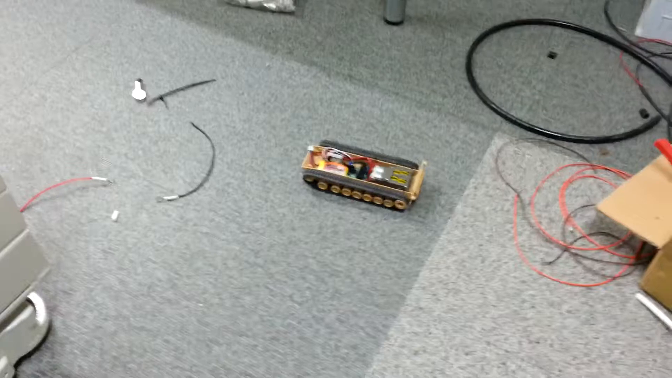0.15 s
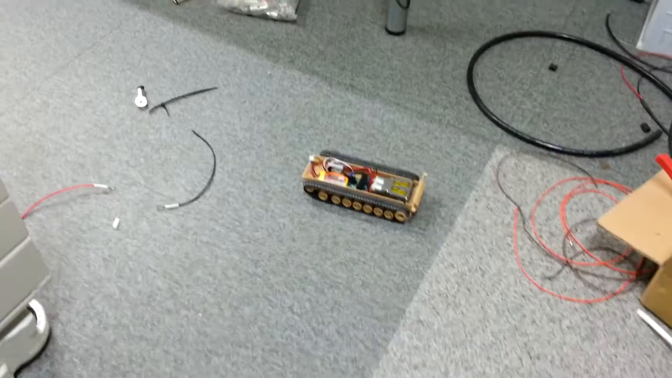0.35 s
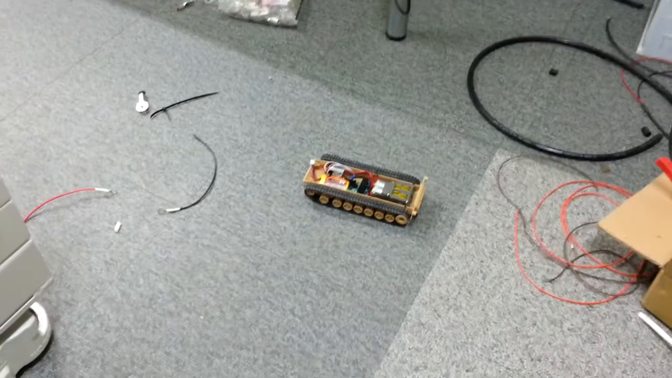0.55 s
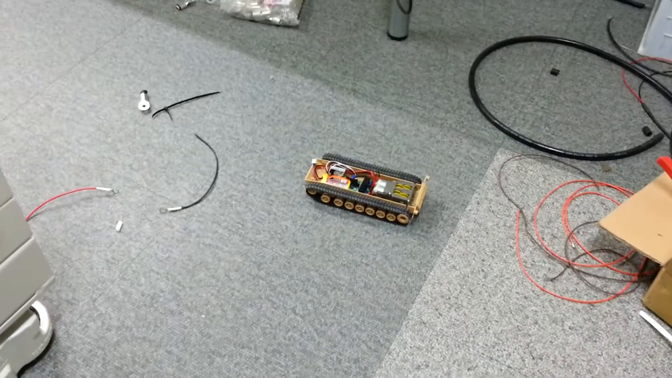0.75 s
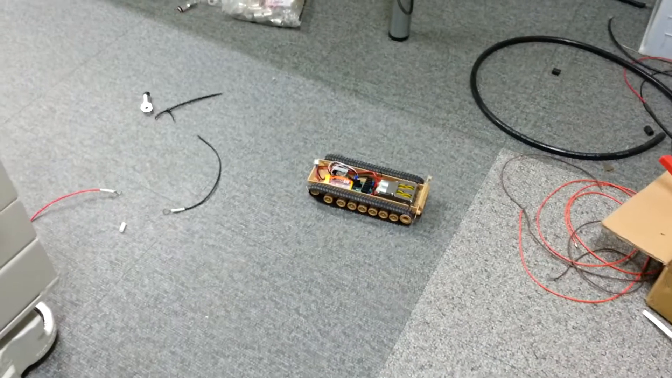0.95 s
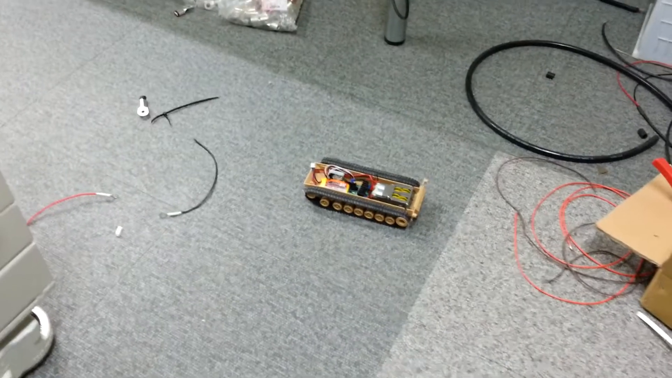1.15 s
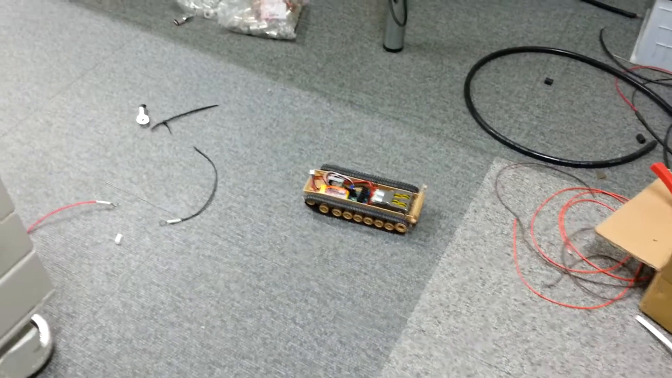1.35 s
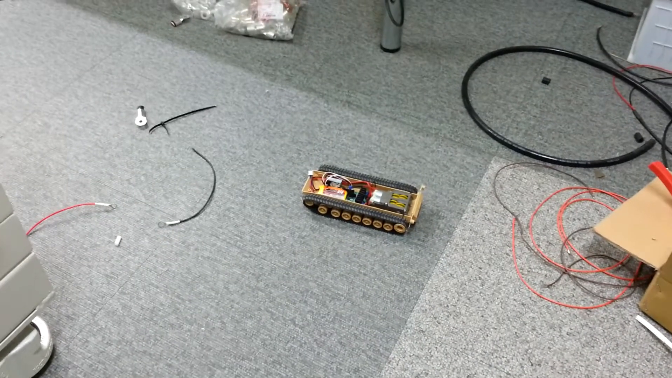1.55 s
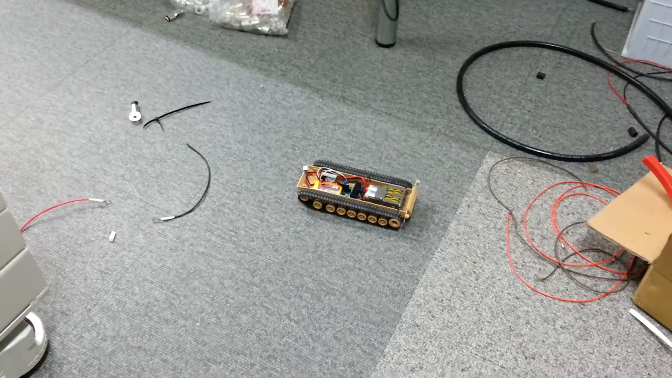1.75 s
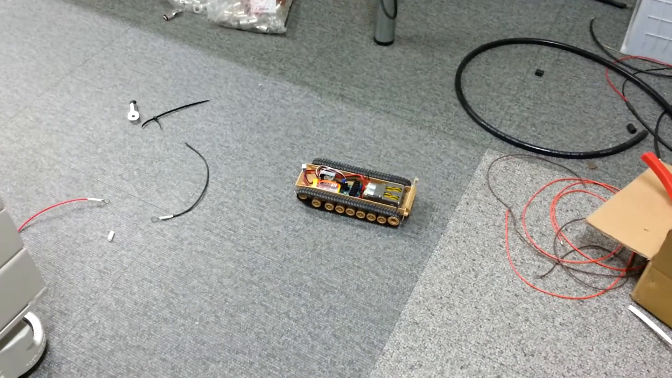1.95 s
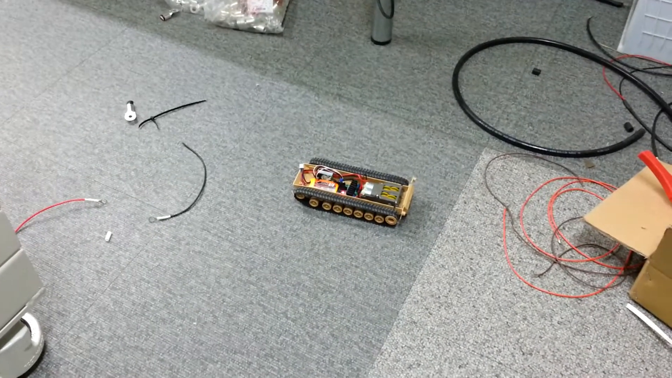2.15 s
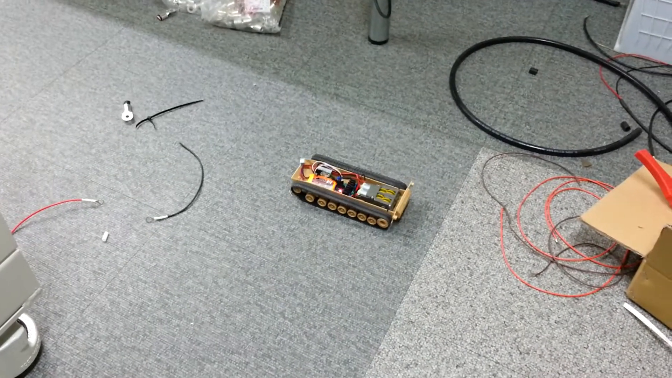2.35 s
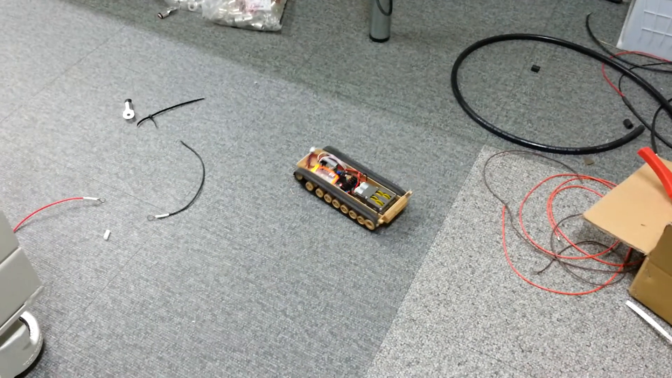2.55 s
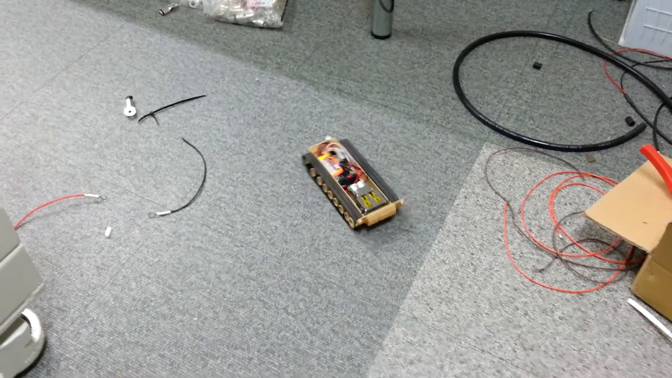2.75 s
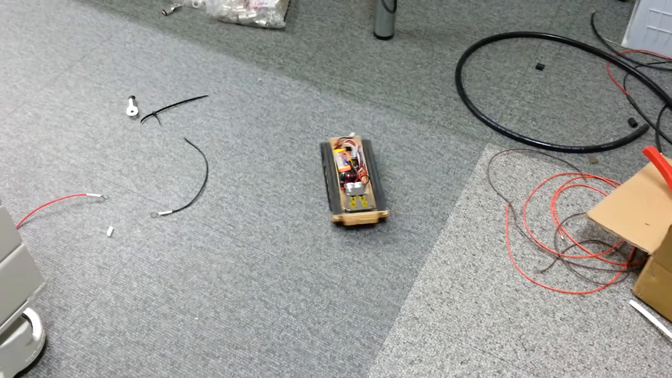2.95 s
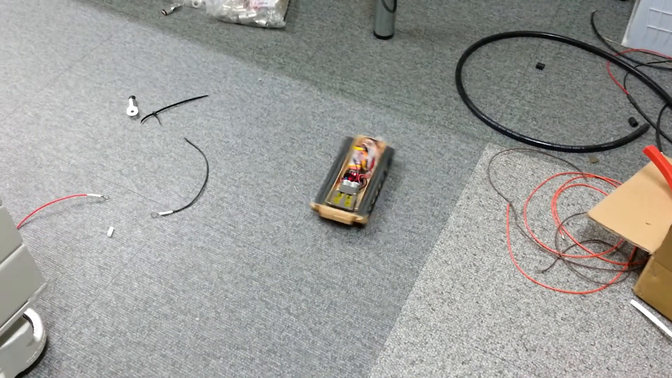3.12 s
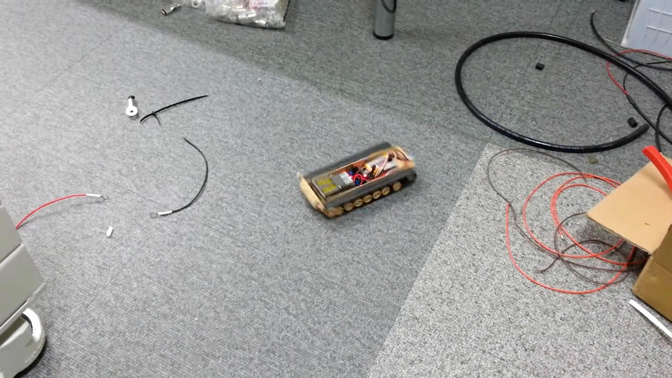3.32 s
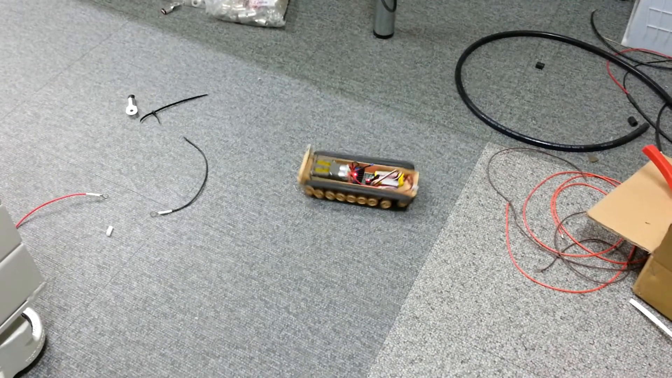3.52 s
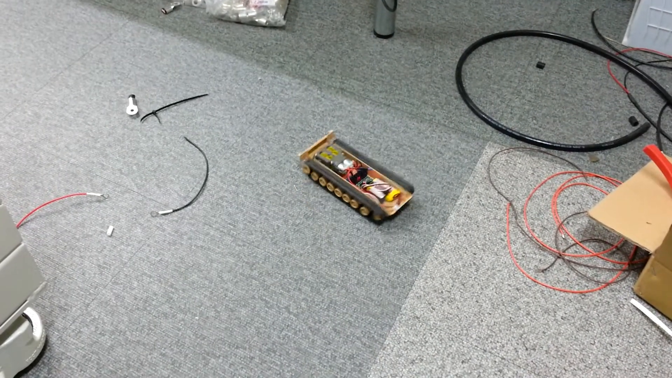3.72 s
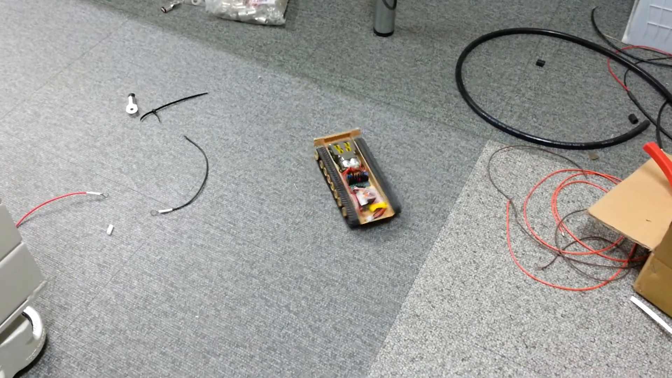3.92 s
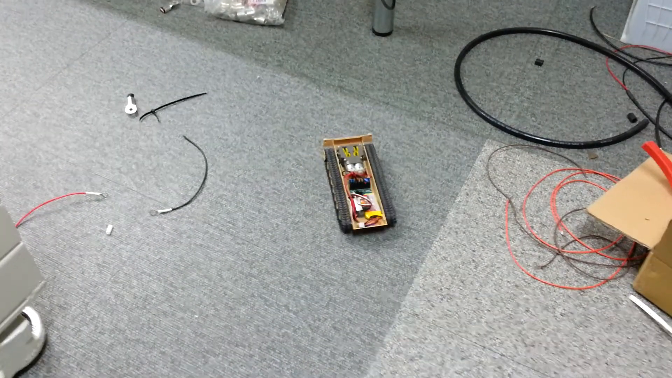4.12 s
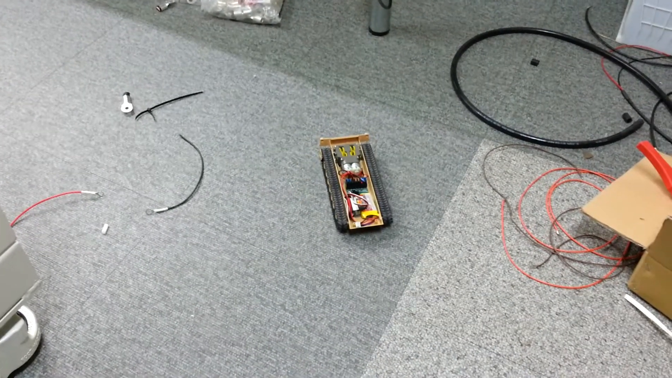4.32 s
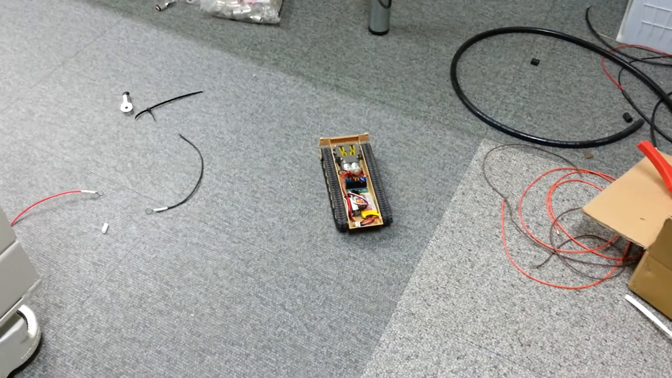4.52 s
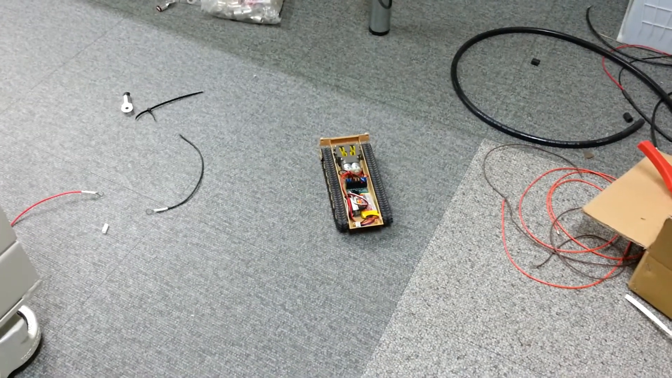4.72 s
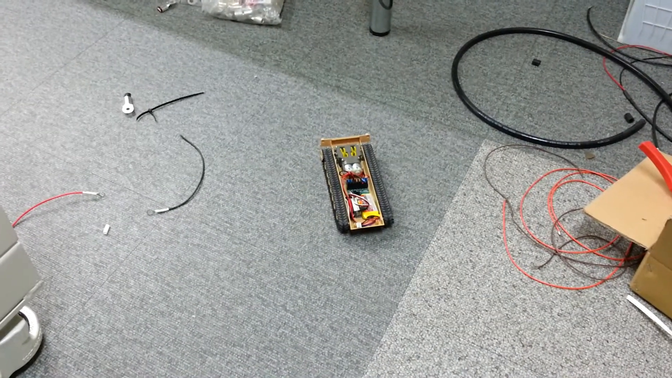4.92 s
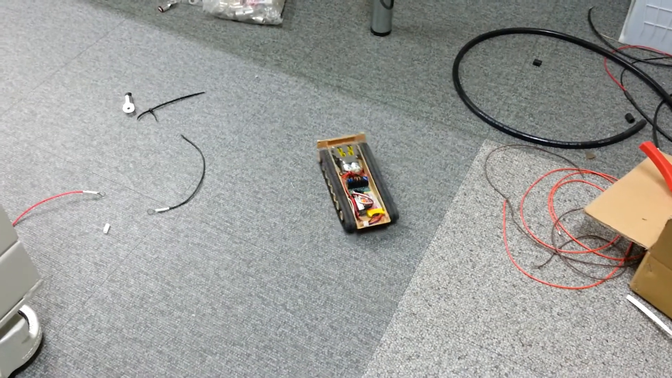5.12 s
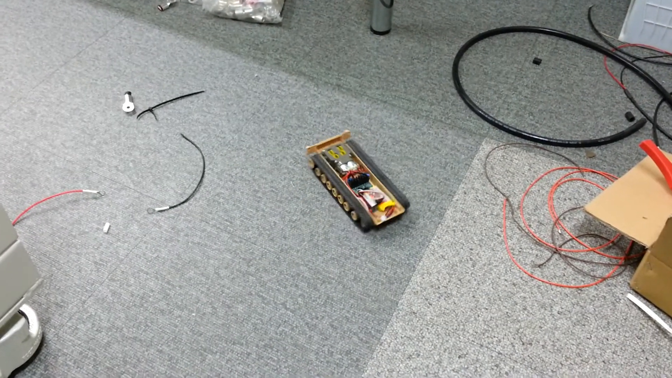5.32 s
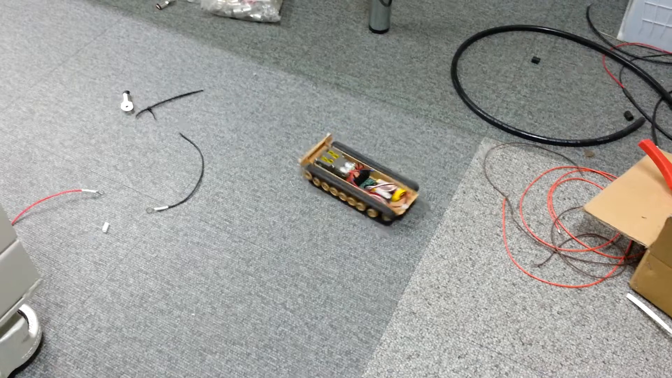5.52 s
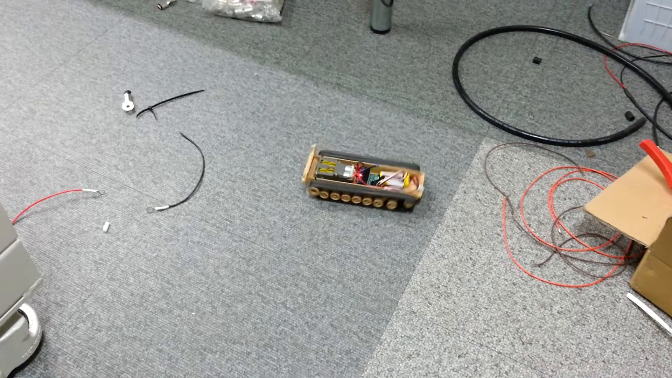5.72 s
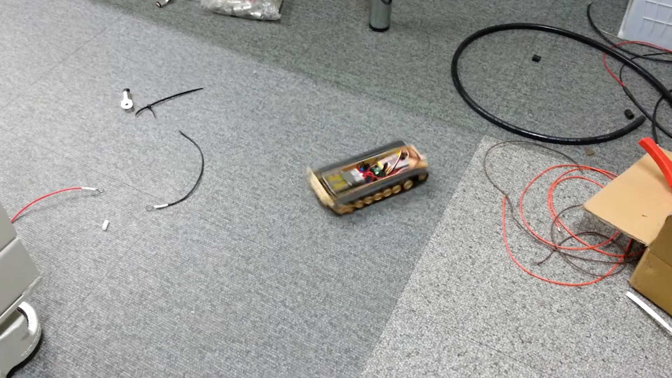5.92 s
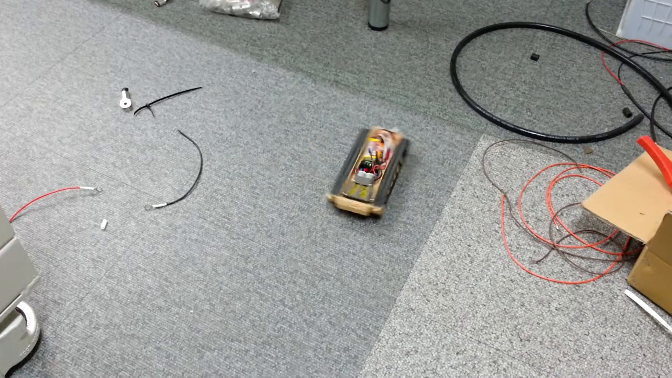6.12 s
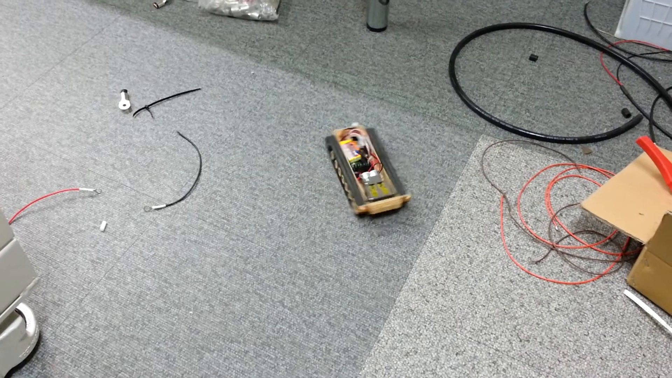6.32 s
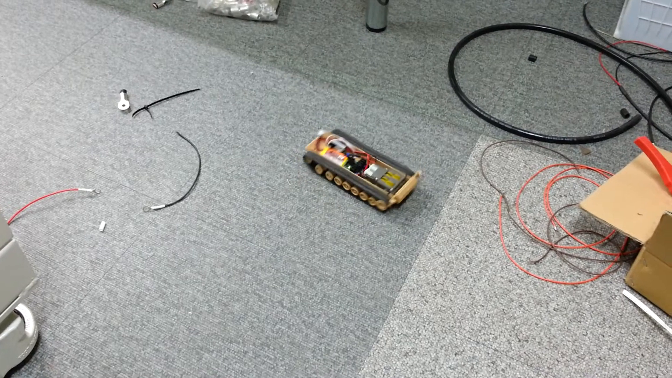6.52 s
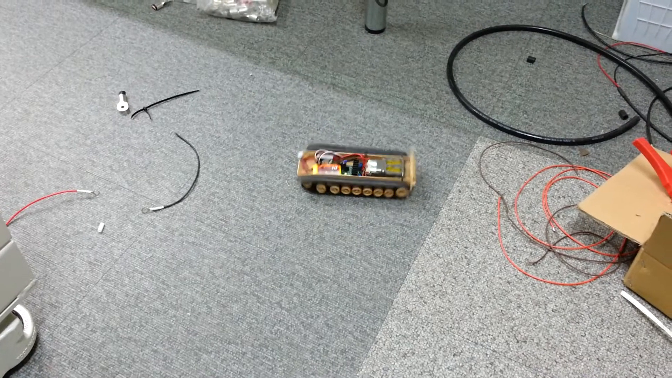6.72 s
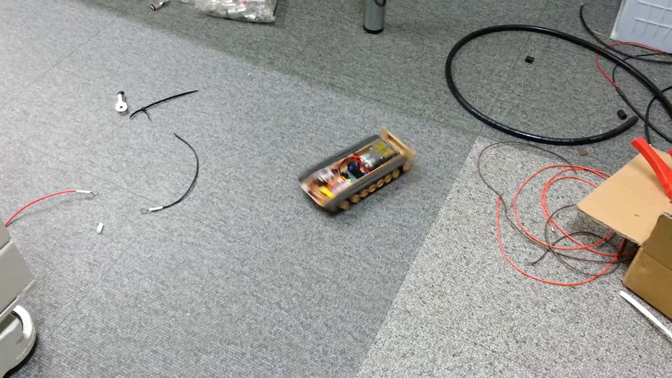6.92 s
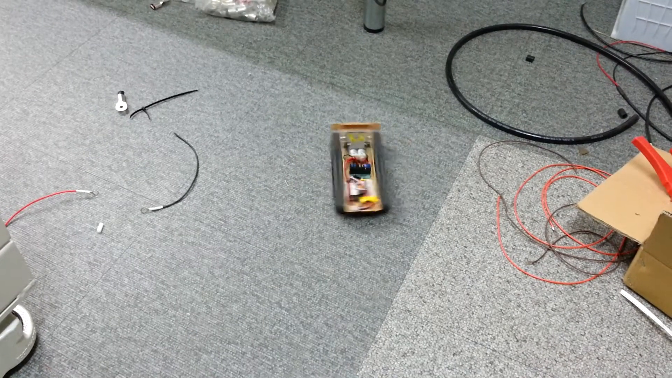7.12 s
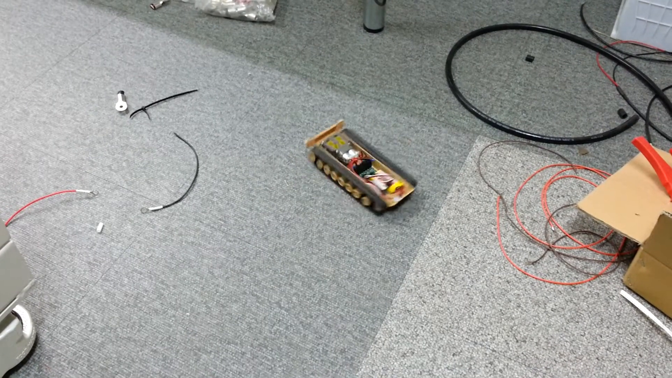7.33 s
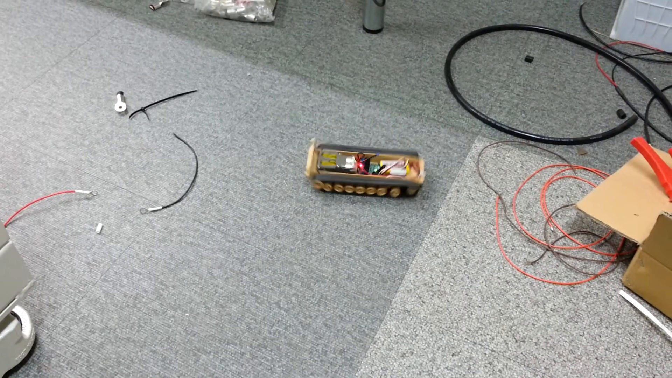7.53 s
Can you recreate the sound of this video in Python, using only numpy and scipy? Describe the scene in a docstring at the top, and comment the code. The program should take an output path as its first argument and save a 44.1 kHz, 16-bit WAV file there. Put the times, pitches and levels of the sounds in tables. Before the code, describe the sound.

A soft ventilation hum fills a room throughout. Right at the start comes a hard little clack, then a short gear rasp that dies away by about 0.4 seconds; a very faint high ring lingers until one second. At 2.2 seconds a small model tank starts spinning on carpet, with a few faint dull bumps. Its two electric motors give a fluttering, high whine that rises in pitch, while loose gears and track links rattle the plastic hull. At 3.9 seconds the whine drops and the drive coasts out, leaving only the hum. At 5 seconds a faster run begins, the whine singing out around 5.6 seconds and climbing higher again near 7 seconds as the rattle brightens. It continues until the end at about 7.6 seconds. The tank sounds fairly close, slightly to the right, with light room reverberation.

```python
"""Over a ventilation hum: a clack, then a brief motor twitch, a short gear rasp that dies away.
A faint ring lingers. From 2.2 s a small model tank spins on an office carpet, rocking with dull bumps.
Each track has its own motor, whose speed follows the throttle: the pinion whines at its tooth rate
while loose gears and track links rattle the plastic hull, brighter the faster they turn.
It coasts out at 3.9 s; a faster run lasts from 5 s to the end. The room answers; hum fills the pauses."""
import sys
import numpy as np
from scipy import signal
from scipy.fft import rfft, irfft, next_fast_len
from scipy.io import wavfile
from scipy.ndimage import uniform_filter1d, minimum_filter1d, map_coordinates

SR = 44100
rng = np.random.default_rng(int(sys.argv[2]) if len(sys.argv) > 2 else 0)


def generate_wav(sig):
    """Save sig (samples, or channels by samples) to the path in sys.argv[1] as 16-bit PCM at SR."""
    pcm = np.round(np.clip(np.atleast_2d(sig).T, -1, 1) * 32767).astype(np.int16)
    wavfile.write(sys.argv[1], SR, pcm)


N = 333837

# Track motors: time_s, tooth_rate_hz, whine_db, flutter_ratio
MOTOR_A = [(2.2, 1000, -36, .02), (2.4, 1150, -33, .025), (2.55, 1700, -33, .04), (2.68, 2020, -33, .04),
           (2.9, 2500, -30, .03), (3.2, 2760, -32, .025), (3.5, 2930, -30, .008), (3.76, 2960, -32, .012),
           (3.86, 3150, -31, .03), (3.925, 3600, -26, .015), (4.02, 2850, -30, .02), (4.3, 800, -35, .02),
           (5.05, 1050, -38, .025), (5.22, 1500, -30, .04), (5.32, 1760, -24.5, .035),
           (5.42, 1960, -27, .04), (5.52, 2260, -23, .018), (5.61, 2410, -23, .01),
           (5.8, 2860, -24.5, .013), (5.97, 2990, -26, .016), (6.25, 3230, -26.5, .012),
           (6.61, 3260, -26.5, .013), (6.8, 3520, -29, .02), (7.02, 4040, -28.5, .007),
           (7.12, 4200, -32, .014), (7.22, 4345, -31, .007), (7.39, 4285, -29.5, .005),
           (7.57, 4480, -33.5, .007)]
MOTOR_B = [(2.2, 900, -36, .02), (2.47, 1400, -35, .03), (2.56, 1660, -24, .025), (2.73, 1950, -30, .04),
           (2.81, 2150, -20.5, .01), (3.0, 2350, -23.5, .016), (3.12, 2500, -21.5, .014),
           (3.27, 2590, -27, .016), (3.33, 2635, -21.5, .005), (3.66, 2765, -21.5, .007),
           (3.8, 2800, -29, .02), (3.92, 3050, -27, .025), (4.0, 2180, -23, .02), (4.3, 800, -34, .02),
           (5.02, 1500, -28, .025), (5.15, 2380, -20.5, .035), (5.28, 2080, -30, .04),
           (5.5, 2300, -30, .04), (5.69, 2950, -24, .025), (5.77, 3140, -27, .02), (5.9, 2950, -28, .03),
           (6.08, 2790, -35, .015), (6.24, 2830, -27.5, .005), (6.66, 2920, -28, .008),
           (6.88, 3600, -33, .03), (6.98, 3870, -23.5, .016), (7.225, 4050, -24, .012),
           (7.232, 2200, -25, .05), (7.28, 2330, -24.5, .05), (7.315, 3130, -26.5, .03),
           (7.42, 3830, -22.5, .014), (7.57, 4050, -30, .02)]
# Whine radiated by the gearbox: freq_hz, gain_db
GEARBOX = [(200, -51), (290, -23), (360, -3), (520, 4), (700, -19), (1200, -11), (1700, -1), (4000, 3),
           (4500, -2), (5050, 9), (5400, 8), (5900, 7), (6500, 6), (8000, -30)]
# Stereo balance: freq_hz, left_minus_right_db
TANK_BALANCE = [(400, 0.5), (950, -1.5), (1500, -6.5), (3500, -9), (5000, -3), (7500, 0), (10000, 6),
                (14000, -0.5)]

def tank():
    """Two drives whine through the gearbox and rattle one hull."""
    whine_a, turns_a, speed_a_oct = whine(MOTOR_A, sideband_db=-9)
    whine_b, turns_b, speed_b_oct = whine(MOTOR_B, sideband_db=-18.5)
    envelope_db, rattle_db, boom_db = drive()
    running = amp(envelope_db)
    pinions = running * (whine_a + amp(-3) * whine_b)
    gears = filtered(pinions, lambda hz: amp(along(GEARBOX, hz)) * panels(hz, panel_db=-7))
    sound = in_room(gears, wet_db=-4)
    clatter = rattle([turns_a, turns_b], np.maximum(speed_a_oct, speed_b_oct), envelope_db, boom_db)
    sound += running * amp(rattle_db) * beamed(clatter)
    sides, left_lead_s = np.array([[.5], [-.5]]), 1.65 / SR
    return filtered(sound, lambda hz: amp(sides * along(TANK_BALANCE, hz))
                    * np.exp(2j * np.pi * hz * sides * left_lead_s))


TEETH, CRUISE_HZ = 8, 2745
WHEEL_PER_TURN, LINKS_PER_TURN = .36, .066  # per motor turn
# Whine partials: shaft_order, level_db
ORDERS = [(1, -21), (3, -15), (4, -11), (5, -4.5), (7, -11), (8, 3.5), (9, -13), (10, -7.5), (13, -19),
          (16, -17)]

def whine(motor, sideband_db):
    """Shaft orders around the tooth rate; returns sound, shaft turns and octaves above cruise."""
    tooth_hz, whine_db, flutter = curves(motor)
    speed_oct = np.log2(tooth_hz / CRUISE_HZ)
    flutter = flutter * amp(-.4 * drag_db())  # pinions run truer under load
    turns = np.cumsum(tooth_hz / TEETH * (1 + flutter * wobble(150))) / SR  # uneven track drag
    mesh_turns = turns + .45 * flutter * wobble(450)  # backlash jitter
    # Faster pinions wobble more on their shafts.
    sidebands = amp(sideband_db + 13 * np.maximum(speed_oct, 0) + 14.5 * np.minimum(speed_oct, 0))
    tone = np.zeros(N)
    for order, level_db in ORDERS:
        gain = 1 if order == TEETH else sidebands * unit(amp(3.5 * wobble(30)))
        tone += amp(level_db) * gain * np.sin(2 * np.pi * (order * mesh_turns + rng.random()))
    # Tooth pressure varies with each wheel turn, and at random.
    growl_db = 4 * np.sin(2 * np.pi * WHEEL_PER_TURN * turns + wobble(60))
    flicker_db = 3.5 * np.tanh(wobble(55)) + 2 * wobble(300) + 1.6 * np.tanh(wobble(14))
    surges = unit(amp(growl_db + flicker_db))
    return np.sqrt(2) * amp(whine_db + drag_db()) * surges * tone, turns, speed_oct


# Hull response: freq_hz, gain_db
HULL = [(240, -75.5), (400, -48), (612, -22.5), (935, -12), (1540, -9.5), (1640, -3.5), (1970, -1.5),
        (2150, 0.5), (2960, 0.5), (4010, -5.5), (5680, -20.5), (9660, -26.5), (13900, -30.5),
        (15000, -47.5)]
# Gear case modes: freq_hz, width_hz, gain_db
CASE_MODES = [(1295, 4.2, -2), (1580, 15, 3), (1815, 19, -2.5), (2480, 23, -29), (2986, 103, 1)]
# Left-right likeness of the tank: freq_hz, coherence
TANK_COHERENCE = [(400, 0.62), (1000, 0.87), (3500, 0.28), (8000, 0.06), (13000, 0.041)]

def rattle(shafts, speed_oct, envelope_db, boom_db):
    """Chatter rings hull, panels and gear case; the colour follows speed and load."""
    blows = spread(chatter(shafts), TANK_COHERENCE)
    hull = filtered(blows, lambda hz: struck_body(HULL, hz) * panels(hz, panel_db=.5))
    hull = in_room(hull, wet_db=-2)
    hull /= np.sqrt(running_power(hull) + 1e-12)
    boom = filtered(hull, lambda hz: 1 / (1 + (hz / 1600) ** 8))
    treble = filtered(hull, lambda hz: 1 / (1 + (3600 / (hz + 1)) ** 8))
    middle = hull - boom - treble
    case = filtered(blows, lambda hz: resonances(CASE_MODES, hz) / (1 + (900 / (hz + 1)) ** 4))
    # Soft knocks are boomier; loaded teeth knock less; slow knocks ring the case most.
    low_db = boom_db + 1.5 * speed_oct - .47 * envelope_db - .99 * drag_db()
    treble_db = -7.5 + 4 * speed_oct - .32 * drag_db()
    case_db = -18.5 - 4.5 * speed_oct
    return (amp(-3) * middle + amp(low_db) * unit(boom)
            + amp(treble_db) * unit(treble) + amp(case_db) * unit(case))


def chatter(shafts):
    """Teeth knock across their backlash, wheels slap, track links click and axles rub."""
    blows, throb_db = np.zeros((2, N)), np.zeros(N)
    for turns in shafts:
        for side in range(2):
            teeth = impacts(turns * 2.7 + .3 * wobble(900))
            slaps = impacts(turns * WHEEL_PER_TURN + .15 * wobble(150))
            clicks = impacts(turns * LINKS_PER_TURN + .3 * wobble(20))
            rub = rng.standard_normal(N)
            blows[side] += teeth + amp(-3) * slaps + amp(-10) * clicks + rub
        throb_db += .9 * np.sin(2 * np.pi * .158 * turns + 2.7 * wobble(12))  # slow wheels
        throb_db += .7 * np.sin(2 * np.pi * LINKS_PER_TURN * turns + wobble(8))  # links on the sprocket
    return blows * amp(throb_db + .61 * wobble(70) + .31 * wobble(17))


def impacts(turns, scatter_db=2.8):
    """One blow of random strength each time turns passes a whole number."""
    hit = np.diff(np.floor(turns), prepend=0) > 0
    return unit(hit * amp(scatter_db * rng.standard_normal(N)))


# Hull panel modes: freq_hz, width_hz, gain_db
PANEL_MODES = [(1125, 25, -2), (1279, 12, 2), (1405, 16, -2), (1470, 25, -3), (1666, 20, 4), (1803, 24, 2),
               (2150, 50, -4.5), (2287, 30, -7), (2348, 27, -7), (2407, 30, -8), (2890, 80, -9),
               (3403, 22, -7), (4021, 40, -8), (4520, 190, -2)]

def panels(hz, panel_db):
    """The panels add narrow resonances to whatever shakes them."""
    return 1 + amp(panel_db) * resonances(PANEL_MODES, hz)


CREEP_DB, COAST_DB, COAST_S = -18, -37, .36
# Powered runs: on_s, off_s, catch_s, bite_s, rattle_db, relative_boom_db
RUNS = [(2.17, 3.926, 0.056, 0.19, -16, -16), (4.957, 7.575, 0.0091, 0.13, -16.5, -17.5)]

def drive():
    """Gears catch and take up slack, tracks bite, and the drive coasts out after power off."""
    envelope_db, rattle_db, boom_db = np.full(N, -120.), np.zeros(N), np.zeros(N)
    for on_s, off_s, catch_s, bite_s, run_rattle_db, run_boom_db in RUNS:
        t = since(on_s)
        catch_db = 20 * np.log10(np.clip(t / catch_s, 1e-6, 1))
        bite_db = CREEP_DB * (1 - np.minimum(t / bite_s, 1) ** 1.46)
        coast_db = COAST_DB * np.minimum(since(off_s) / COAST_S, 2) ** 1.58
        live = t > 0
        envelope_db[live] = (catch_db + bite_db + coast_db)[live]
        rattle_db[live], boom_db[live] = run_rattle_db, run_boom_db
    return envelope_db, rattle_db, boom_db


# Track drag: centre_s, half_length_s, whine_gain_db
DRAGS = [(2.821, 0.038, 3), (3.607, 0.22, .5), (5.589, 0.067, 3), (5.844, 0.056, 3)]

def drag_db():
    """The tracks drag hard on the carpet and both pinions sing out."""
    return sum(gain_db * swell(centre_s, half_s) for centre_s, half_s, gain_db in DRAGS)


# Hull rotation: time_s, angle_deg
HEADING = [(2.4, -240), (4.0, 5), (5.2, 5), (6.0, -105), (6.75, -250), (7.57, -440)]

def heading_rad():
    """The hull's angle, zero with its rear gear end to the listener."""
    return np.radians(curves(HEADING)[0])


def beamed(x, centre_hz=4100, half_width_hz=850, depth_db=2.1):
    """The rear gear end throws the bright band forward, so the rattle dulls as it points away."""
    bright = filtered(x, lambda hz: 1 / (1 + ((hz - centre_hz) / half_width_hz) ** 4))
    return x + (amp(depth_db * np.cos(heading_rad())) - 1) * bright


# Knock and bounces: start_s, relative_db
CLACKS = [(0.045, -4.5), (0.0489, -10), (0.072, -17)]
# Clack response: freq_hz, gain_db
CLACK_BODY = [(100, -38), (300, -16), (420, -11), (620, -5.5), (1000, -2), (1300, -2.5), (2000, -2.5),
              (3100, -7.5), (4800, -15.5), (7200, -34.5), (14000, -41)]
# Clack modes: freq_hz, width_hz, gain_db
CLACK_MODES = [(427, 27, 7), (1300, 58, 8), (1490, 34, 1.5), (2200, 62, 2), (2540, 120, 0)]

def clack(snap_t60_s=.0027, tail_t60_s=.15):
    """A hard knock and two bounces ring a few modes."""
    blows, t = np.zeros(N), np.arange(SR // 8) / SR
    decay = amp(-60 * t / snap_t60_s) + amp(-5.5 - 60 * t / tail_t60_s)
    for start_s, relative_db in CLACKS:
        blows[round(start_s * SR):][:len(t)] += amp(relative_db) * decay * rng.standard_normal(len(t))
    knock = filtered(blows, lambda hz: struck_body(CLACK_BODY, hz) * (1 + resonances(CLACK_MODES, hz)))
    return amp(-42.5) * in_room(unit(knock), wet_db=-8)


# Gear rasp spectrum: freq_hz, density_db
TWITCH_SPECTRUM = [(100, -47), (400, -15), (770, -7.5), (1330, -2.5), (1800, -2), (2200, 1.5), (3000, -4.5),
                   (5000, -12.5), (7000, -21), (14000, -26.5)]

def motor_twitch(start_s=.078, end_s=.29, peak_db=-33.25):
    """A short gear rasp leads in softly, swells, then dies away with a quiet, slower tail."""
    lead_db = -7.5 * (1 - after(start_s))
    rise_db = -11 * np.maximum(end_s - since(0), 0)
    release_db = np.maximum(-246 * since(end_s), -12.5 - 27 * since(end_s))
    level_db = peak_db + lead_db + rise_db + release_db + .73 * wobble(122)
    return amp(level_db) * noise(TWITCH_SPECTRUM, TANK_COHERENCE)


# Ring spectrum: freq_hz, density_db
RING_SPECTRUM = [(1000, -77), (1900, -24), (2256, -7), (2650, -24), (5000, -72)]

def faint_ring(start_s=.05, end_s=1.06):
    """A narrow band of noise swells slowly and dies fast."""
    level_db = -67 + 9 * since(start_s) - 154 * since(end_s)
    return amp(level_db) * after(start_s) * noise(RING_SPECTRUM, TANK_COHERENCE)


# Hull bumps: centre_s, half_length_s, level_db
BUMPS = [(2.375, 0.11, -53), (2.728, 0.052, -49.5), (2.81, 0.13, -57)]
# Bump spectrum: freq_hz, density_db
BUMP_SPECTRUM = [(120, -60), (240, -25), (420, -4), (600, -3), (900, -47)]

def bumps():
    """The hull rocks on the carpet as the first spin gets going."""
    envelope = sum(amp(level_db) * swell(centre_s, half_s) for centre_s, half_s, level_db in BUMPS)
    return envelope * noise(BUMP_SPECTRUM, TANK_COHERENCE)


# Fan lines: pitch_hz, level_db
FAN_LINES = [(317.6, -87), (414.5, -66.5), (834.4, -65.5), (952.8, -71)]
# Air spectrum: freq_hz, density_db
AIR_SPECTRUM = [(15, -61.5), (25, -29.5), (237, -10), (344, -11), (415, -9), (637, -7), (709, -7),
                (811, -8.5), (1090, -12.5), (1240, -13), (1500, -12), (5720, -22.5), (13800, -20.5),
                (15000, -23.5)]
# Left-right likeness of the air: freq_hz, coherence
AIR_COHERENCE = [(60, 0.027), (240, 0.45), (950, 0), (3770, -0.0), (15000, 0.01)]

def ventilation():
    """Steady room air with a few wavering fan lines."""
    hum = np.zeros(N)
    for pitch_hz, level_db in FAN_LINES:
        gain = amp(level_db + 2.2 * wobble(4.4))
        hum += gain * np.sin(2 * np.pi * pitch_hz * since(0) + .49 * wobble(18))
    return amp(-51) * noise(AIR_SPECTRUM, AIR_COHERENCE) + hum


# Room decay: freq_hz, t60_s
ROOM_DECAY = [(200, 0.77), (2000, 0.36), (10000, 0.46)]

def in_room(x, wet_db):
    """Direct sound plus a diffuse stereo tail that changes as the hull turns."""
    echo = 0
    for share in (np.cos(heading_rad()), np.sin(heading_rad())):
        hz, t, bands = signal.stft(rng.standard_normal((2, SR // 2)), SR, nperseg=256)
        decay = amp(-60 * t / along(ROOM_DECAY, hz)[:, None])
        tail = signal.istft(bands * decay, SR, nperseg=256)[1]
        tail = np.pad(tail / np.linalg.norm(tail[0]), ((0, 0), (128, 0)))  # 3 ms pre-delay
        echo = echo + signal.fftconvolve(np.atleast_2d(share * x), tail, axes=1)[:, :N]
    return (x + amp(wet_db) * echo) / np.sqrt(1 + amp(2 * wet_db))


def struck_body(spectrum, hz):
    """Minimum-phase response: the body rings only after the blow."""
    cepstrum = irfft(np.log(amp(along(spectrum, hz)) + 1e-6))
    cepstrum[1:len(cepstrum) // 2] *= 2
    cepstrum[len(cepstrum) // 2 + 1:] = 0
    return np.exp(rfft(cepstrum))


def resonances(modes, hz):
    """Summed response of damped modes."""
    return sum(amp(gain_db) * 1j * hz * width_hz / (mode_hz ** 2 - hz ** 2 + 1j * hz * width_hz)
               for mode_hz, width_hz, gain_db in modes)


def noise(spectrum, coherence):
    """Coloured stereo noise of rms 1."""
    pair = filtered(rng.standard_normal((2, N)), lambda hz: amp(along(spectrum, hz)))
    return unit(spread(pair, coherence))


def spread(pair, coherence):
    """Mix two unrelated signals to left and right with the given coherence."""
    angle = lambda hz: np.arccos(np.clip(along(coherence, hz), -1, 1)) / 2
    mid, side = filtered(pair, lambda hz: np.array([np.cos(angle(hz)), np.sin(angle(hz))]))
    return np.array([mid + side, mid - side])


def filtered(x, response):
    """Apply a complex frequency response."""
    size = next_fast_len(N + SR // 2)
    return irfft(rfft(x, size) * response(np.fft.rfftfreq(size, 1 / SR)), size)[..., :N]


def along(points, hz):
    """Interpolate on a log frequency axis."""
    freq_hz, values = np.transpose(points)
    return np.interp(np.log(hz + 1), np.log(freq_hz + 1), values)


def curves(rows):
    """One value per sample for each column after time_s."""
    time_s, *columns = np.transpose(rows)
    return [np.interp(since(0), time_s, column) for column in columns]


def wobble(rate_hz):
    """Smooth random curve with knots at rate_hz."""
    knots = rng.standard_normal(int(N * rate_hz / SR) + 4)
    return map_coordinates(knots, [np.arange(N) * rate_hz / SR])


def since(start_s):
    """Seconds since start_s, zero before."""
    return np.maximum(np.arange(N) / SR - start_s, 0)


def after(start_s):
    """Soft step from 0 to 1."""
    return uniform_filter1d(1. * (since(start_s) > 0), size=200)


def swell(centre_s, half_s):
    """Bell curve of height 1."""
    return np.exp(-((since(0) - centre_s) / half_s) ** 2)


def running_power(x):
    """Mean square of both channels over 136 ms."""
    return np.abs(uniform_filter1d(np.mean(x ** 2, 0), size=6000))


def amp(db):
    """Decibels to gain."""
    return 10 ** (np.asarray(db) / 20)


def unit(x):
    """Scale to rms 1."""
    return x / np.sqrt(np.mean(x ** 2) + 1e-20)


def scene():
    """Tank and clack over the room's air, whose bass drops away under loud sound."""
    pan_right = amp([[-2.2], [2.2]])
    sound = tank() + pan_right * (clack() + motor_twitch() + faint_ring()) + bumps()
    air = ventilation()
    loudness = np.sqrt(running_power(sound))
    duck = 1 / (1 + (amp(-21.5) / (loudness + 1e-9)) ** 3)
    bass = filtered(air, lambda hz: 1 / (1 + (hz / 650) ** 8))
    return sound + air - duck * bass


TOP_HZ = 14750

def record(dry):
    """A fast limiter at full scale, then a hard band limit."""
    needed = 1 / np.maximum(np.abs(dry).max(0), 1)
    gain = uniform_filter1d(minimum_filter1d(needed, size=129), size=129)
    return filtered(dry * gain, lambda hz: hz < TOP_HZ)


dry = scene()
out = record(dry)
generate_wav(out)
```